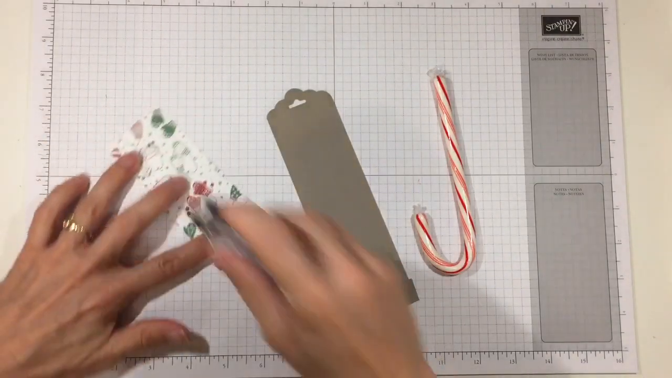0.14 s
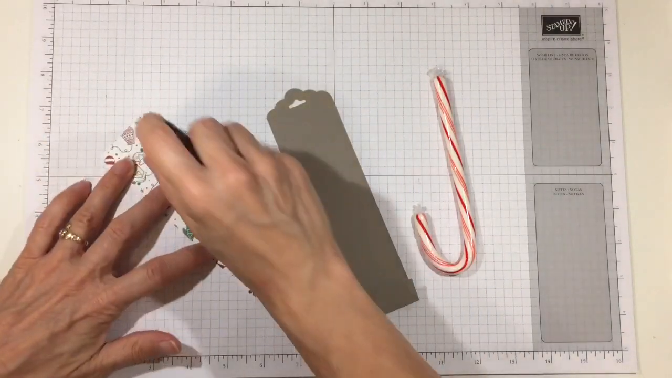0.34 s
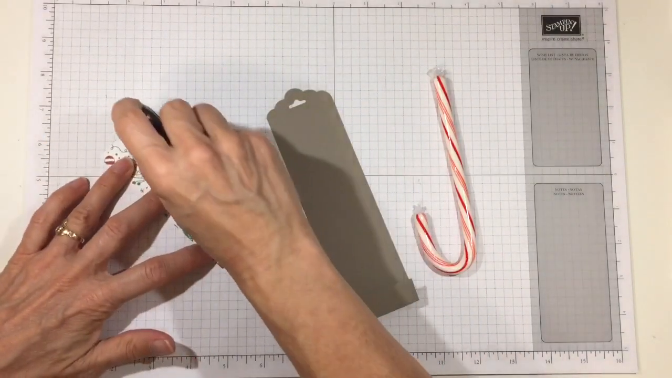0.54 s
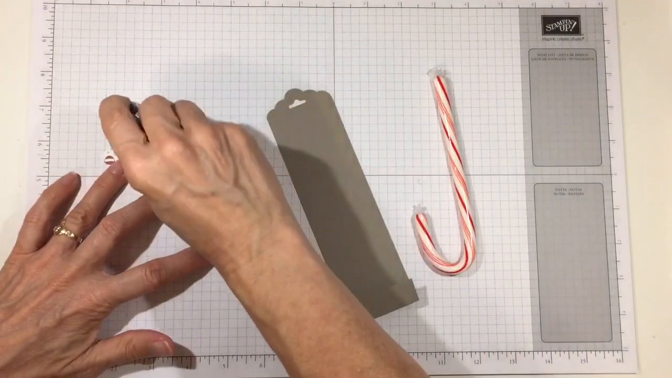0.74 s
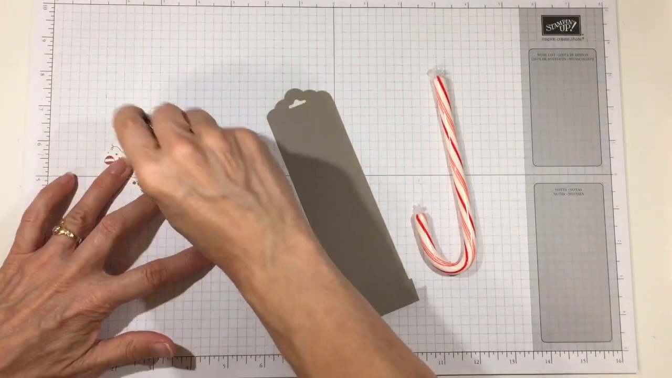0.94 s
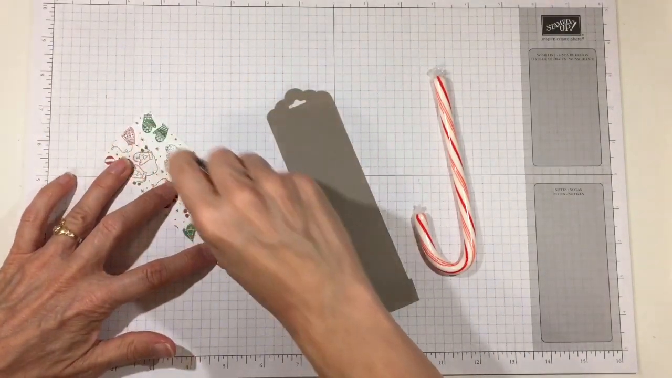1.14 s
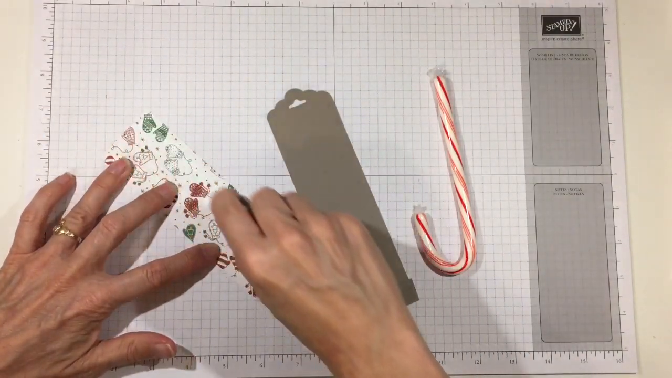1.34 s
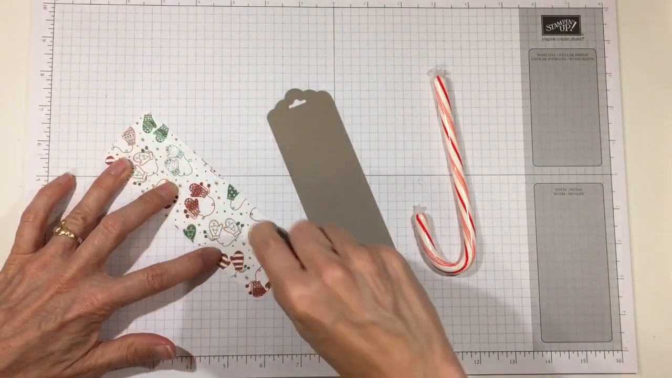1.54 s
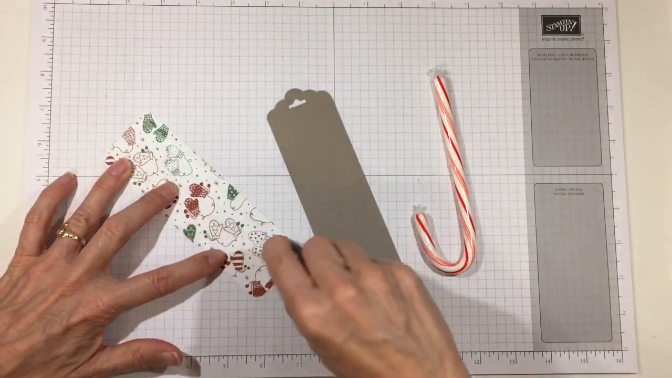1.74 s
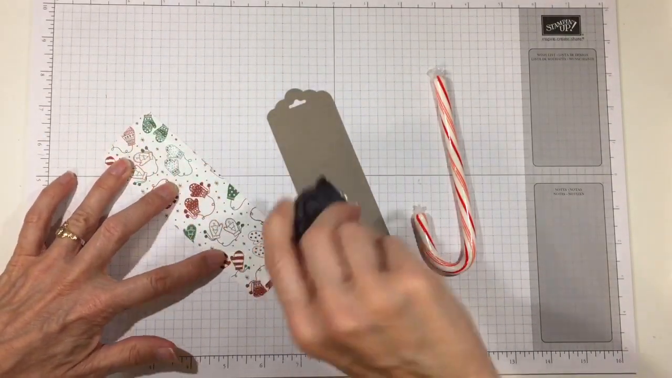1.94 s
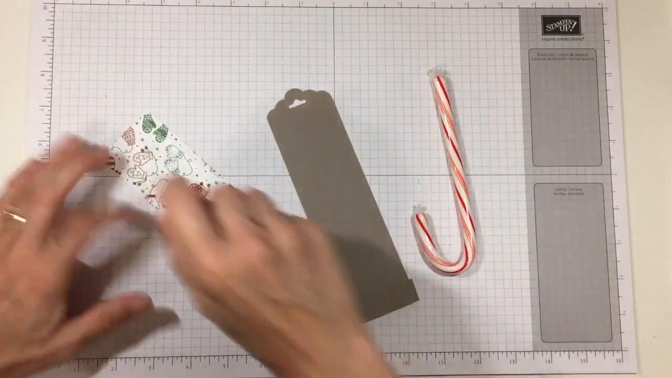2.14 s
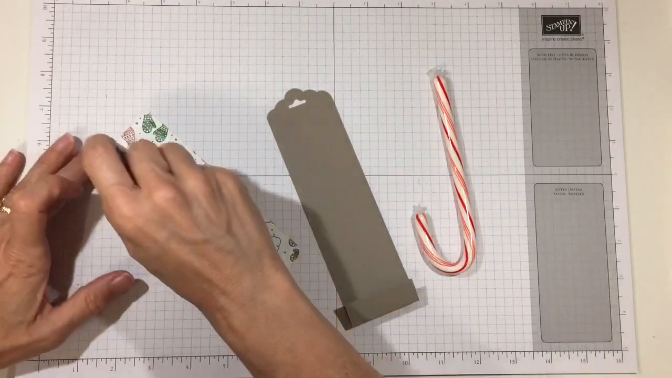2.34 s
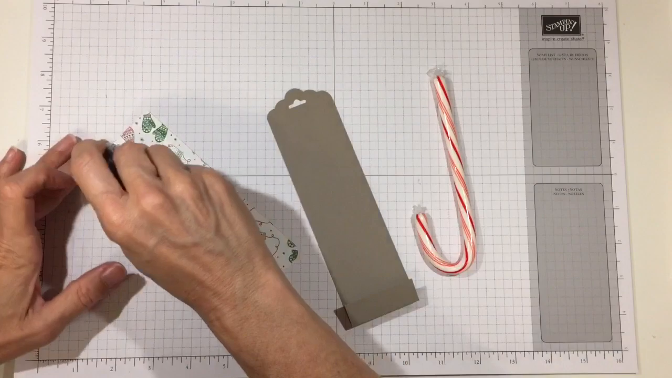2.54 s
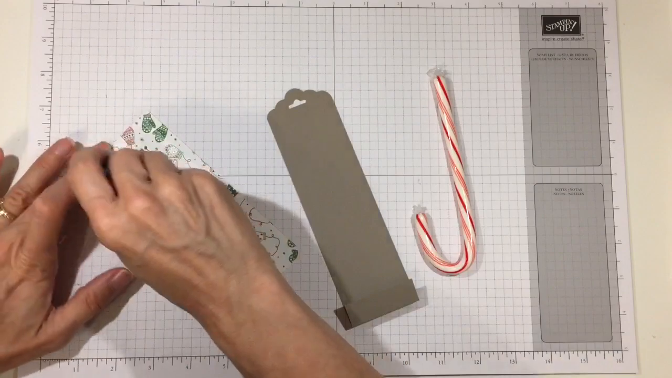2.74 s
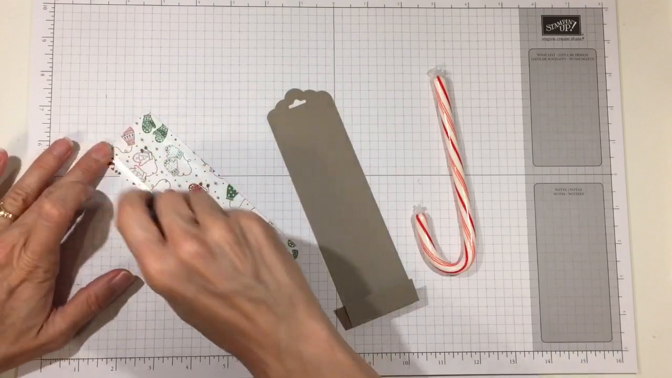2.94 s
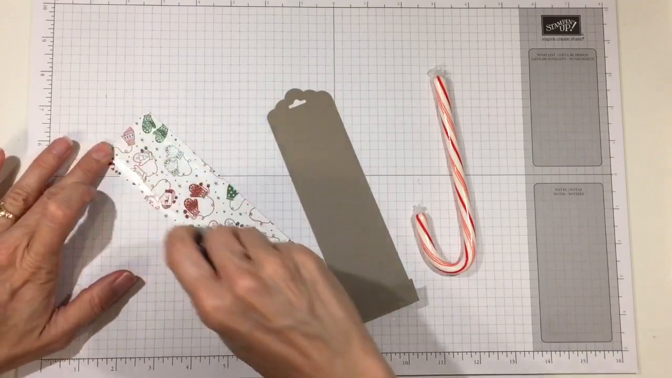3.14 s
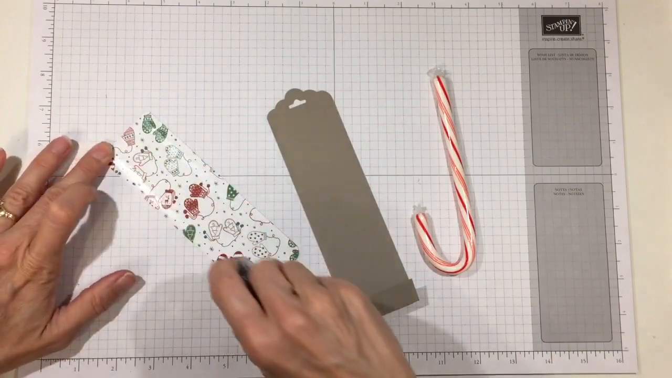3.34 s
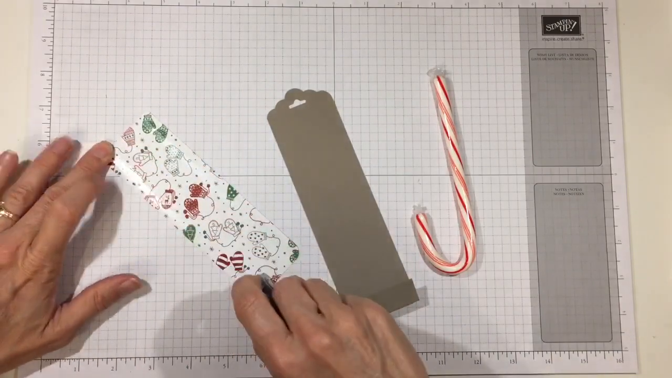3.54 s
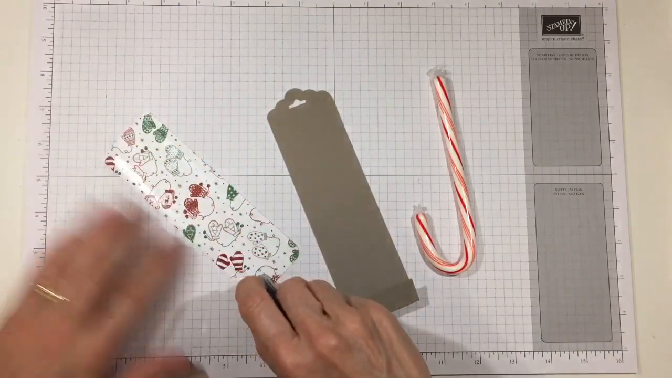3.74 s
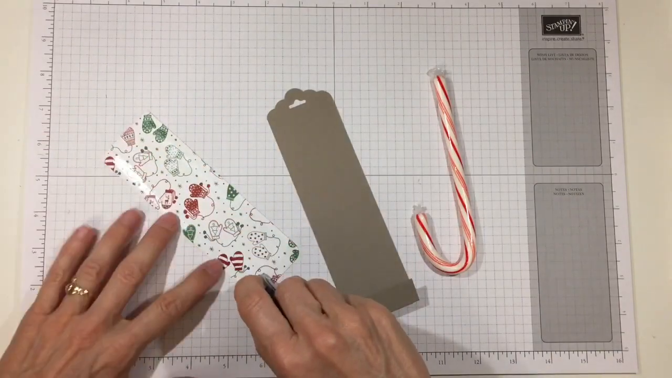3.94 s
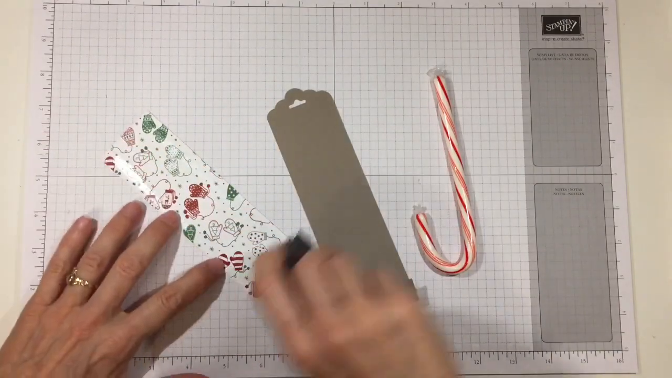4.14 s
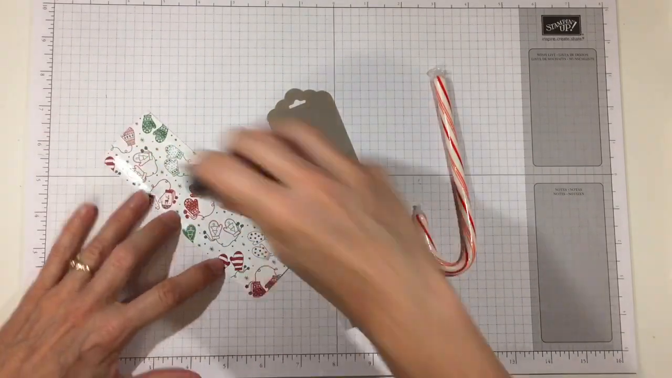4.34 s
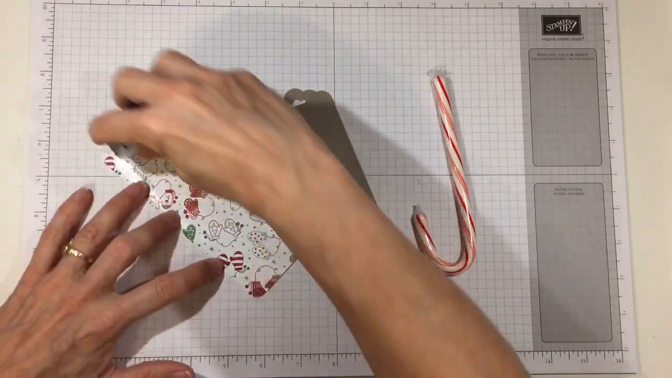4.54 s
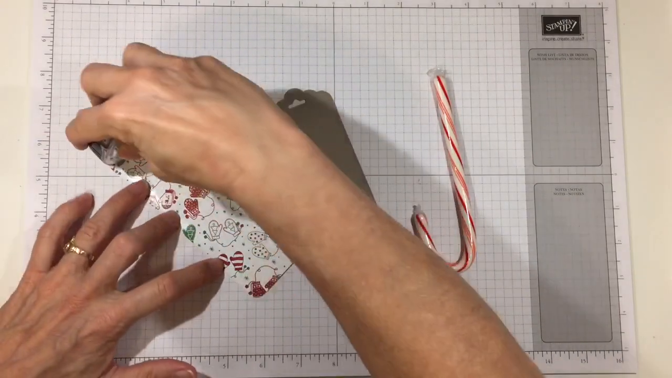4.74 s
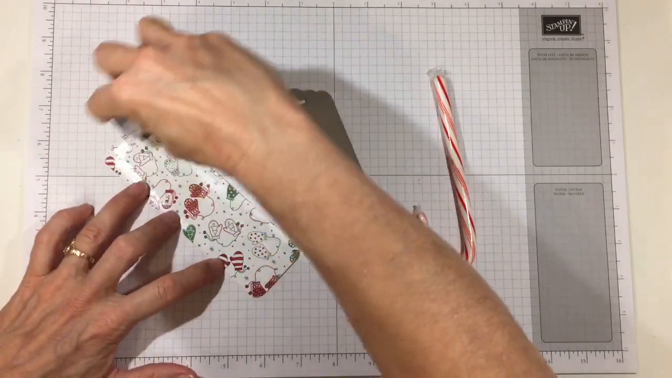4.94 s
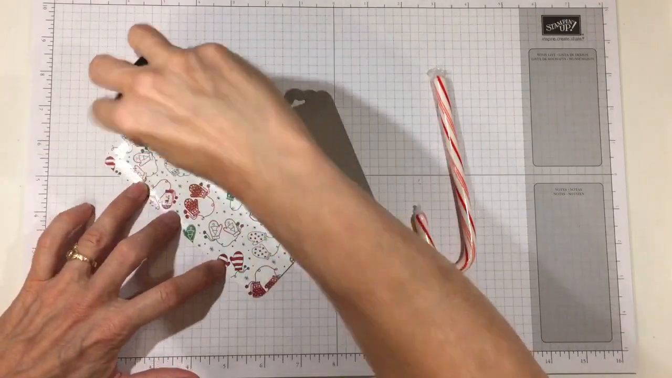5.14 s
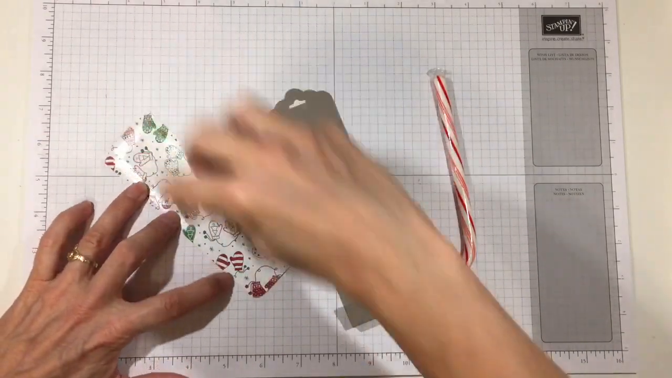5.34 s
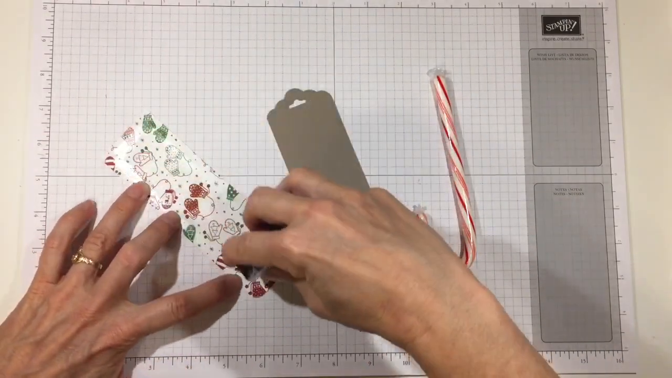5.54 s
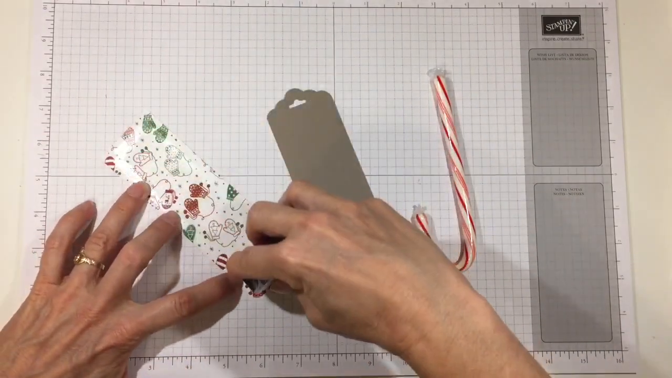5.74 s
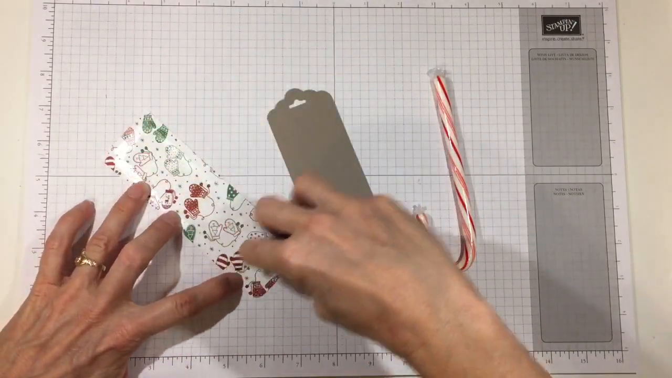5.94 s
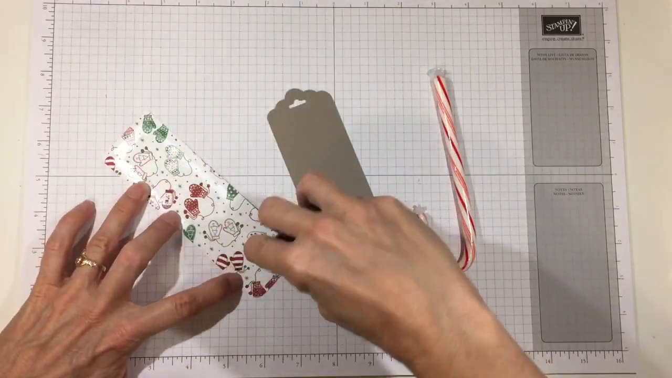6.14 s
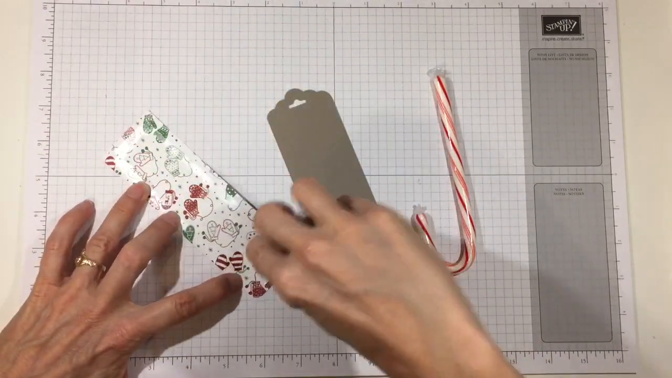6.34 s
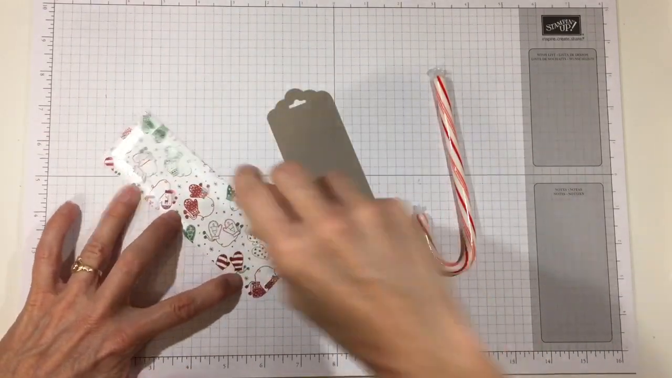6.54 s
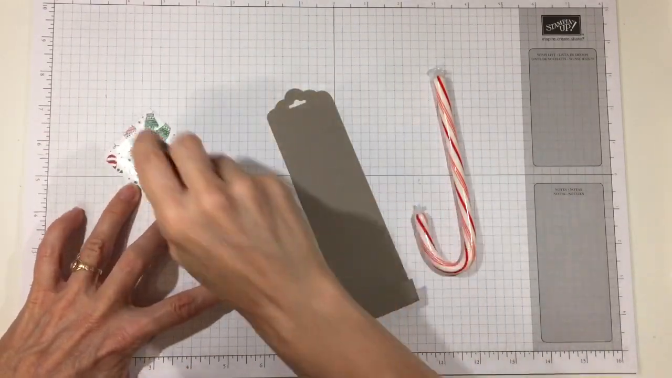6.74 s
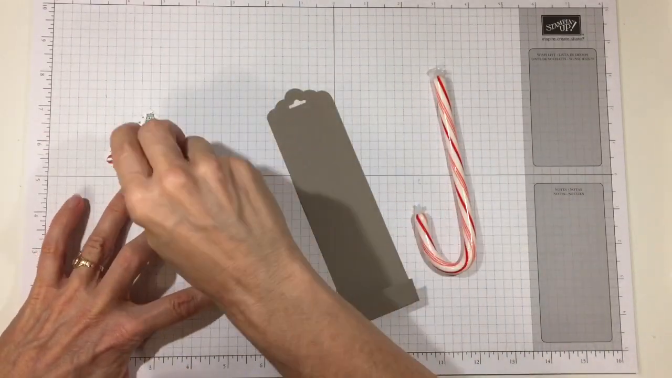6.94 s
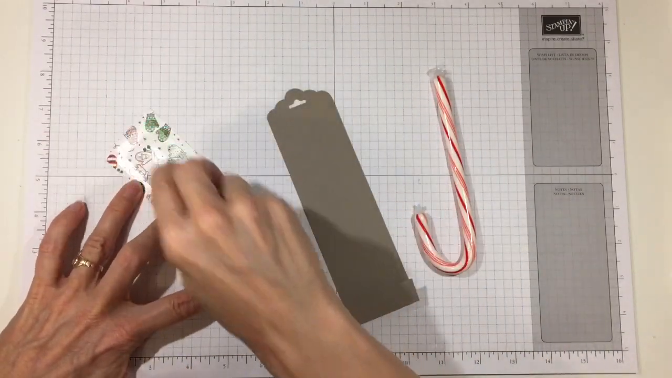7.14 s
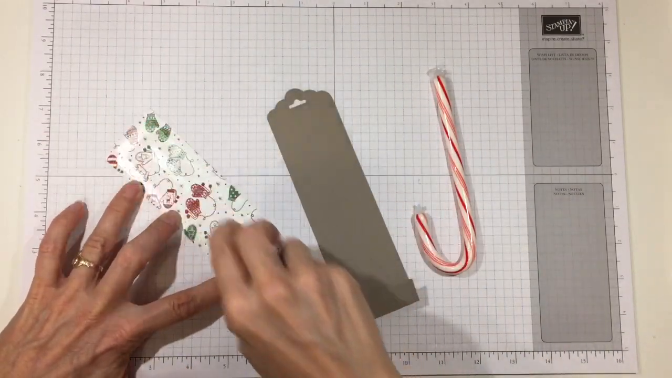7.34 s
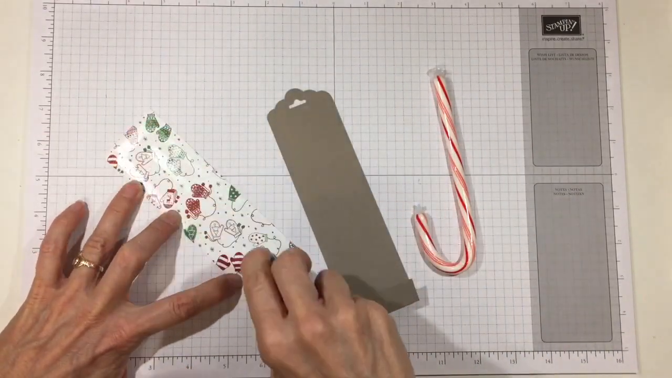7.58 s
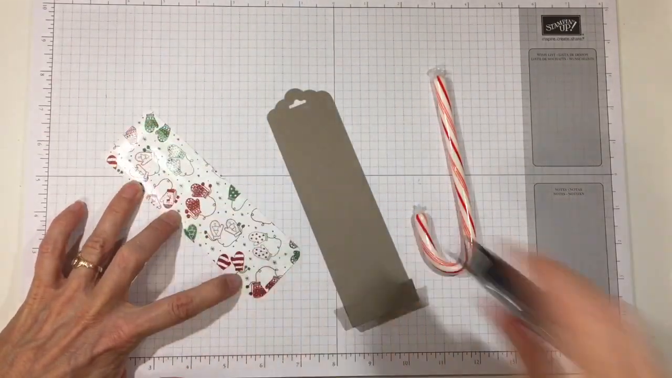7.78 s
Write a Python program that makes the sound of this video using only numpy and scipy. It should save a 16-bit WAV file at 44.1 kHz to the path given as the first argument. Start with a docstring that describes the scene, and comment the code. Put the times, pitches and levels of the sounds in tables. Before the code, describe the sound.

A plastic tape runner rasps over paper in five ratcheting strokes, with small ticks, slipping clicks and soft table bumps between them in a quiet room.

```python
"""A close microphone over a craft table in a small quiet room: steady air, a soft bump, a brief hiss of paper.
Then the plastic tape runner and the paper tick, and the runner is drawn over paper in five strokes. Its ratchet
pawl snaps tooth after tooth, at a rate that follows the wheel speed, and rattles the resonant hollow case.
Between strokes come more ticks, slipping teeth and bumps that ring the table top and its frame.
All contacts are shaped noise or impulses through resonances; the room lets their noise linger."""
import sys
import numpy as np
from scipy import signal
from scipy.fft import rfft, irfft, next_fast_len
from scipy.io import wavfile
from scipy.ndimage import map_coordinates

SR = 44100
rng = np.random.default_rng(int(sys.argv[2]) if len(sys.argv) > 2 else 0)


def dump(signal):
    """Clip the signal to [-1, 1] and save it as 16-bit WAV at the path in sys.argv[1]."""
    limited = np.clip(np.atleast_2d(signal).T, -1, 1)
    pcm = np.round(limited * 32767).astype(np.int16)
    wavfile.write(sys.argv[1], SR, pcm)


N = 344417  # length [samples]


def amp(db):
    """dB to gain."""
    return 10 ** (np.asarray(db) / 20)


def unit(x):
    """Scaled to rms 1."""
    return x / np.sqrt(np.mean(x ** 2) + 1e-20)


def along(points, hz):
    """Values between (frequency, value) points, read on a log frequency axis."""
    f, v = np.transpose(points)
    return np.interp(np.log(hz + 1), np.log(f + 1), v)


def filtered(x, response):
    """x through a complex response of frequency, with silence after it for the tail."""
    m = next_fast_len(N + SR // 2)
    spectrum = rfft(x, m) * response(np.fft.rfftfreq(m, 1 / SR))
    return irfft(spectrum, m)[..., :N]


def modes(rows):
    """Causal response of resonances (centre [Hz], width [Hz], level [dB]), alternating in sign."""
    def response(f):
        total = 0
        for k, (centre, width, db) in enumerate(rows):
            damped = 1j * f * width
            total = total + (-1) ** k * amp(db) * damped / (centre ** 2 - f ** 2 + damped)
        return total
    return response


def air():
    """The steady hush of room and microphone: noise coloured by a fixed spectrum."""
    # colour of the hush: (frequency [Hz], relative level [dB])
    air_colour = [(28, -13), (64, -1.5), (100, -3.5), (220, -4.5), (500, -12.5), (1600, -14.5), (5000, -20),
                  (16000, -28)]
    hush = unit(filtered(rng.standard_normal(N), lambda hz: amp(along(air_colour, hz))))
    return amp(-69.5) * hush


def chatter(times, db, length, hz, lumps, room_db, rise=0.086, knock=0):
    """Noise puffs: one clean knock, a rise, a lumpy chatter, a fast fade; the room lets their power linger.

    length is in seconds, rise is a share of it; hz picks the room's decay time.
    """
    # decay of the small room: (frequency [Hz], time to fall 60 dB [s])
    room_decay = [(1500, 0.16), (14000, 0.16)]
    u = np.arange(SR // 40)[None] / SR / np.abs(length)[:, None]  # time in puff lengths
    shape = (1 - np.exp(-u / rise)) * np.exp(-u ** 4)
    at = np.round(times * SR).astype(int)[:, None] + np.arange(u.shape[1])
    puff_power = (amp(db)[:, None] * shape) ** 2
    power = np.bincount(at.ravel(), puff_power.ravel(), N + SR)[:N]

    keep = amp(-120 / SR / along(room_decay, hz))  # share of the room's power left after one sample
    lingering = signal.lfilter([1 - keep], [1, -keep], power)
    noise_level = np.sqrt(power * lumps ** 2 + amp(room_db) ** 2 * lingering)

    knock_size = knock * amp(db) * np.sqrt(np.abs(length) * SR)
    knocks = np.bincount(at[:, SR // 1000], knock_size, N + SR)[:N]  # 1 ms into each puff
    return noise_level * rng.standard_normal(N) + knocks


def table(on_top, on_frame):
    """Soft forces ring the table top and its frame; the lowest and the high pitches are weakened."""
    # resonances of the table top: (centre [Hz], width [Hz], relative level [dB])
    top_modes = [(171.5, 58, -1), (225.8, 28.6, 6), (295.4, 34, 0)]
    # resonance of the frame, passed twice: (centre [Hz], width of one pass [Hz], relative level [dB])
    frame_modes = [(63.3, 12.7, 0)]
    top = filtered(on_top, modes(top_modes))
    frame = filtered(on_frame, lambda hz: modes(frame_modes)(hz) ** 2)
    # one high-pass pole at 110 Hz, four low-pass poles at 480 Hz
    return filtered(top + frame, lambda hz: 1j * hz / (110 + 1j * hz) / (1 + 1j * hz / 480) ** 4)


def bumps():
    """Hands and runner meet the table and scuff it briefly; each landing also pushes the frame."""
    # landings: (time [s], relative level [dB], further level on the frame [dB])
    landings = [(0.009, -46.5, -7), (0.679, -47.5, -16), (0.762, -49.5, -29), (1.854, -38.5, -26),
                (4.848, -48, -31), (5.131, -50, -37.5), (5.76, -51.5, 3), (6.126, -52, -28),
                (6.234, -45, -38.5), (6.633, -43.5, -17.5), (6.897, -34.5, -23), (7.668, -42, -37)]
    s, db, deep_db = np.transpose(landings)
    at = np.round(s * SR).astype(int)
    scuff = chatter(s, db + 18.5, np.full(len(s), .016), 1500, 0.9, room_db=0.5)
    on_top = np.bincount(at, amp(db + 49.0), N)[:N]
    on_frame = np.bincount(at, amp(db + deep_db + 69.5), N)[:N]
    return table(on_top + scuff, on_frame)


def slide():
    """Paper hisses once over the mat: coloured noise that swells, flutters and fades."""
    # colour of the hiss: (frequency [Hz], relative level [dB])
    paper_colour = [(400, -15), (1000, -6.5), (1600, 3), (2500, -5), (6500, -4), (16000, -5.5)]
    start_s, rise_s, hold_s, fall_db_per_s = 0.026, 0.025, 0.16, 170
    level_db, flutter_depth_db = -58, 2.5
    t = np.arange(N) / SR - start_s
    hiss = unit(filtered(rng.standard_normal(N), lambda hz: amp(along(paper_colour, hz))))
    flutter_db = flutter_depth_db * map_coordinates(rng.standard_normal(N // 1000), [np.arange(N) / 1200])
    fall_db = fall_db_per_s * np.clip(t - rise_s - hold_s, 0, None)
    return hiss * np.clip(t / rise_s, 0, 1) * amp(level_db + flutter_db - fall_db)


def bent(x, response, shift_hz):
    """x through a response, then moved in frequency by a changing amount (single-sideband shift)."""
    turn = (2 * np.pi * (np.cumsum(shift_hz) / SR % 1)).astype(np.float32)
    in_phase, quarter = filtered(x, lambda f: response(f) * [[1], [-1j]])
    return in_phase * np.cos(turn) - quarter * np.sin(turn)


def treble_share(hz):
    """0 in the low modes, 1 in the treble, half at 4500 Hz."""
    return 1 / (1 + (4500 / hz) ** 4)


def case(rows, length, favour_db, lumps_db, room_db, rise, knock):
    """Contacts ring each mode by how near it lies to a favoured pitch and draw it towards that pitch.

    Sharper contacts carry more treble; a duller and a sharper rattle fill the spectrum between the modes.
    """
    # modes of the hollow case, passed twice, before bending:
    # (centre [Hz], width of one pass [Hz], relative level [dB])
    case_modes = [(1425, 274, 2), (1794, 565, -2), (2422, 426, -3), (2982, 370, -3.5), (3870, 740, -8.5),
                  (4440, 350, -5.5), (5490, 650, -8.5), (6410, 740, -10), (8560, 1500, -13.5),
                  (13040, 3800, -15)]
    # colour of the rattle between the modes: (frequency [Hz], relative level [dB])
    rattle_colour = [(400, -32), (700, -16), (1050, -16.5), (3000, -6), (7000, -12.5), (16000, -24)]
    columns = np.transpose(rows)
    s, db, treble_db = columns[:3]
    favoured_hz = columns[3:]
    lumps = amp(lumps_db * map_coordinates(rng.standard_normal(N // 20), [np.arange(N) / 40]))
    order = np.argsort(s)
    started = np.searchsorted(s[order] * SR, np.arange(N))
    latest = order[np.clip(started - 1, 0, None)]  # the contact now sounding

    sound = 0
    for hz, width, mode_db in case_modes:
        nearness = np.exp(-(np.log(hz / favoured_hz) / 0.14) ** 2)
        # the grip drifts, 8 random points a second
        damping, bending = [map_coordinates(rng.standard_normal(N // 1000), [8 * s]) for _ in range(2)]
        level_db = db + treble_db * treble_share(hz) + favour_db * nearness.max(0) + 1.7 * damping
        shift_hz = .5 * (nearness * (favoured_hz - hz)).sum(0) + .015 * hz * bending
        sound += bent(chatter(s, level_db, length, hz, lumps, room_db, rise, knock),
                      lambda f: amp(mode_db) * modes([(hz, width, 0)])(f) ** 2, shift_hz[latest])

    dull = filtered(chatter(s, db, length, 2000, lumps, room_db, rise),
                    lambda hz: amp(along(rattle_colour, hz)) * (1 - treble_share(hz + 1)))
    sharp = filtered(chatter(s, db + treble_db, 1.12 * length, 9000, lumps ** 2.4, room_db, rise),
                     lambda hz: amp(along(rattle_colour, hz)) * treble_share(hz + 1))
    return sound + dull + sharp


def ticks():
    """Short light contacts knock the case; duller ones last longer, the brightest hardly move the low modes."""
    # ticks of case and paper: (time [s], relative level [dB], treble [dB], favoured pitch [Hz])
    contacts = [(0.676, -48, 6, 1720), (0.702, -46.5, -36, 1678), (0.725, -45.5, -6, 1712),
                (0.745, -43.5, 5, 1780), (0.764, -40, 3, 6960), (0.804, -41, 0.5, 2860),
                (0.888, -39.5, -1, 2500), (0.919, -43, -12, 1800), (1.891, -43, -5, 2663),
                (1.991, -43.5, 5, 1980), (2.107, -46, -2, 2383), (2.116, -45.5, -12, 1590),
                (2.13, -53, -15, 1603), (2.212, -41, 3.5, 2020), (2.591, -49, -5, 1880),
                (2.611, -44, 4, 1878), (2.664, -46.5, 3, 1599), (2.703, -47.5, 14, 2500),
                (2.715, -42, -14, 6170), (2.764, -49.5, -22, 2900), (3.927, -53.5, -22, 1407),
                (3.947, -43, -4, 1390), (4.106, -52, 0, 1414), (4.132, -43.5, 7, 5920),
                (4.148, -38.5, 3, 2552), (4.274, -54, -11, 3053), (4.415, -38.5, -8.5, 1928),
                (4.663, -48.5, -12, 1600), (4.742, -51, -3, 1697), (4.758, -43.5, -22, 1795),
                (4.774, -39, -4, 1712), (4.787, -43.5, -0.5, 2762), (4.821, -46, -10, 2884),
                (4.918, -46.5, -15, 1883), (4.932, -44, -14, 4815), (5.309, -44.5, -1.5, 3534),
                (5.761, -54, -20, 1450), (5.771, -48.5, -10, 1459), (5.907, -51.5, -22, 3160),
                (5.947, -49, -33, 1410), (6.288, -54, -2, 1500), (6.455, -48.5, 2, 1379),
                (6.489, -44.5, 0, 2010), (6.597, -54.5, 15, 7080), (6.632, -45.5, 5, 2363),
                (6.951, -43, 4, 1795), (7.017, -47, 2, 1576), (7.031, -43, -8, 3136),
                (7.05, -44.5, -39, 2560), (7.073, -41, -2, 4253), (7.667, -40.5, -2.5, 1407),
                (7.677, -44.5, 1, 1217), (7.703, -45.5, -9, 6230), (7.787, -52.5, -9, 1890)]
    s, db, treble_db, favoured_hz = np.transpose(contacts)
    eased_db = db - np.clip(treble_db - 6.5, 0, None)
    rows = np.transpose([s, eased_db, treble_db, favoured_hz])
    length = 0.0044 * amp(-.15 * treble_db)
    return amp(9) * case(rows, length, favour_db=10, lumps_db=1.5, room_db=-3.5, rise=0.083, knock=0.62)


def teeth():
    """Snaps (time, level, treble, low pitch, high pitch), one for each whole tooth the wheel turns, and slips."""
    # one table a stroke: (time [s], wheel speed [teeth/s], relative snap level [dB],
    # favoured low pitch [Hz], favoured high pitch [Hz])
    strokes = [
        [(0.95, 23.8, -33, 2300, 4690), (1.078, 77.5, -33.5, 2300, 4610), (1.137, 102, -31.5, 2303, 6170),
         (1.29, 70, -33, 2414, 4700), (1.377, 63.3, -33, 2467, 6820), (1.5, 66, -32, 2940, 6820),
         (1.615, 60.8, -32.5, 3055, 5470), (1.741, 34.7, -32, 3004, 5410)],
        [(2.783, 15.4, -34.5, 2725, 5513), (2.857, 52, -33, 2307, 6510), (3.0, 91.4, -35, 2419, 5790),
         (3.171, 63.7, -33.5, 2933, 6100), (3.229, 68, -31.5, 2902, 6225), (3.33, 60.5, -33, 2660, 5400),
         (3.519, 48.8, -33, 2796, 5610), (3.604, 13.4, -31.5, 2827, 5890)],
        [(4.957, 63, -34, 1791, 4823), (5.017, 96, -30, 1790, 5480), (5.046, 71.6, -32.5, 1790, 5560)],
        [(5.985, 28.1, -30.5, 1417, 4385), (6.008, 110.3, -33, 1425, 4450), (6.061, 59.7, -33, 1427, 4390)],
        [(7.087, 49.6, -32, 2200, 5490), (7.234, 101.4, -32.5, 2392, 5500), (7.414, 92.6, -33, 2569, 5400),
         (7.45, 79.4, -31, 2726, 5377), (7.556, 64.5, -32, 2710, 5463), (7.592, 21.6, -36.5, 2750, 5484)],
    ]
    # single teeth slipping while the runner is set down or lifted:
    # (time [s], relative snap level [dB], treble [dB], favoured low pitch [Hz])
    slips = [(1.916, -30.5, 1, 2850), (1.927, -32.5, -40, 1794), (4.166, -39, -6, 1420),
             (5.2146, -31.5, -4, 1483), (6.168, -34.5, -2.5, 1392), (6.302, -35, 1, 1597),
             (6.31, -34, -12, 1503), (6.331, -33.5, 1, 1501), (6.38, -30, -3, 1423),
             (6.895, -35.5, -12, 1727), (6.911, -27.5, -10.5, 1527), (7.718, -37, -5, 1470),
             (7.724, -32.5, -9, 1450)]
    slip_high_hz, coast_s = 4233, .004  # the wheel coasts on briefly after a stroke
    rows = []
    for when, speed, db, low_hz, high_hz in map(np.transpose, strokes):
        t = np.arange(when[0], when[-1] + coast_s, 1 / SR)
        turned = np.cumsum(np.interp(t, when, speed)) / SR  # in teeth
        s = np.interp(np.arange(int(turned[-1]) + 1), turned, t)
        # no two teeth alike: spread in s, dB, dB
        late, louder_db, treble_db = (rng.standard_normal((len(s), 3)) * [.0004, .7, .8]).T
        snap_db = np.interp(s, when, db) + louder_db
        rows += [np.transpose([s + late, snap_db, treble_db,
                               np.interp(s, when, low_hz), np.interp(s, when, high_hz)])]
    return np.vstack(rows + [[(*slip, slip_high_hz) for slip in slips]])


def ratchet():
    """The pawl chatters some milliseconds after each tooth; the roller drags on the table, pushing its frame."""
    rows = teeth()
    chance = rng.standard_normal((len(rows), 3))
    s, db = rows[:, 0], rows[:, 1]
    length = 0.0094 * amp(1.22 * chance[:, 0])
    snap = amp(11.5) * case(rows, length, favour_db=4.2, lumps_db=2.0, room_db=-3.5, rise=0.16, knock=0.14)
    drag = chatter(s, db + 4.0 + 3 * chance[:, 1], length, 1500, 0.76, room_db=-1)
    pushes = np.bincount(np.round(s * SR).astype(int), amp(db + 32.5 + 3.0 * chance[:, 2]), N)[:N]
    return snap + table(drag, pushes)


def scene():
    """All sources, close to one microphone above the table."""
    return (air() + bumps() + slide() + ticks() + ratchet())[None]


def record(dry):
    """The finished sound is low-passed: nothing from 15850 Hz upwards."""
    return filtered(dry, lambda hz: hz < 15850)


dry = scene()
out = record(dry)
dump(out)
```